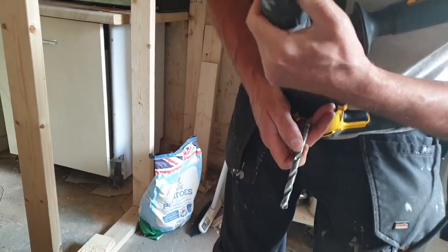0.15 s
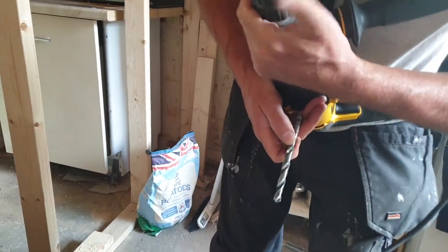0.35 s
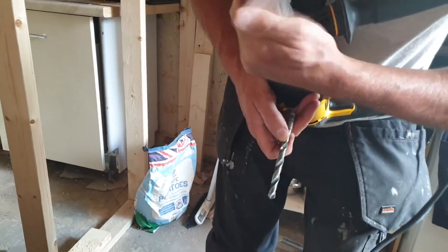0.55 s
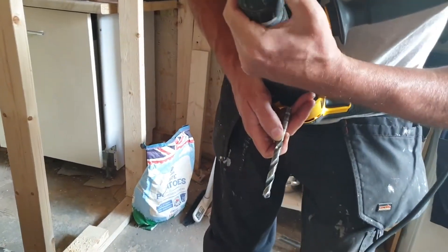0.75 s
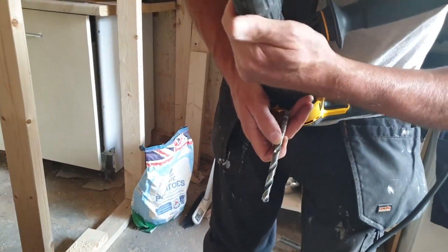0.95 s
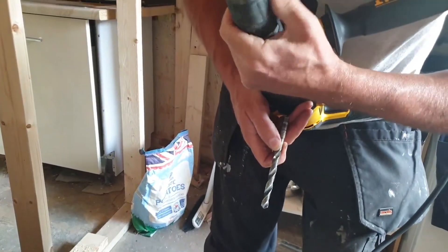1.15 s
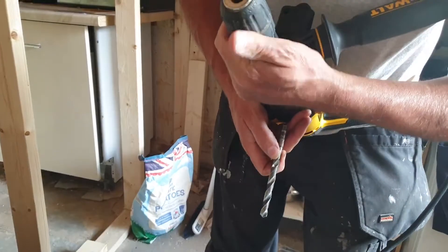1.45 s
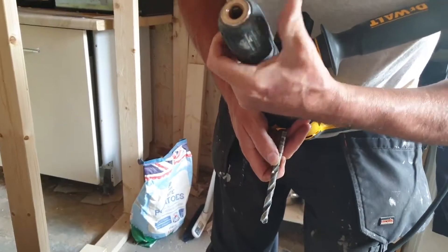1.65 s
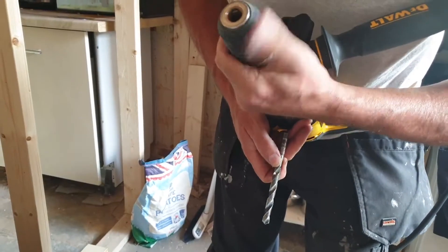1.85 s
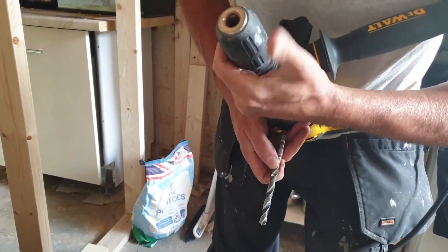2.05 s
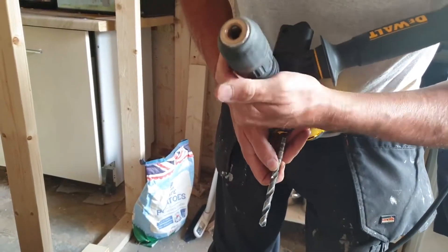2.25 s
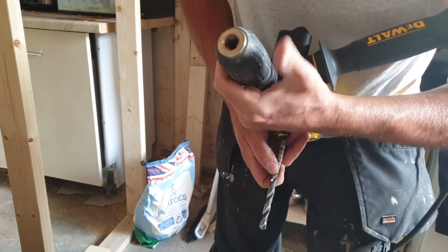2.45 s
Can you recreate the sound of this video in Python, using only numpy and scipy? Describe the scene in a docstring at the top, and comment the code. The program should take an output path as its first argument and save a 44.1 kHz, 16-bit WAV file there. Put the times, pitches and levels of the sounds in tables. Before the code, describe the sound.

A keyless drill chuck is twisted by hand, close and slightly left, with the motor off. Skin brushes the sleeve, then a clack and a sharp snap come at about 0.2 seconds. Seven short ratcheting rasps follow evenly from 0.3 to 2.3 seconds, the last two loudest, with light clacks between them. A faint thin whine comes and goes just after 1 second. Quiet air of a small room lies underneath.

```python
"""Close stereo microphone in a small timber-framed room; just to the left, a keyless drill chuck is
twisted by hand, motor off. Skin brushes the sleeve, the loose sleeve clacks as the hand grips, and
the lock snaps hard, once. Seven twists drag the pawls over the ratchet teeth, each swelling and
fading with the speed of the sleeve, with more clacks as the hand grips again. About a second in,
a faint thin whine comes and goes. Quiet room air lies under it all."""
import sys
import numpy as np
from scipy import signal
from scipy.fft import rfft, irfft
from scipy.io import wavfile

SR = 44100
rng = np.random.default_rng(int(sys.argv[2]) if len(sys.argv) > 2 else 0)


def materialize(psi):
    """Save the field psi as 16-bit PCM at rate SR to the path in sys.argv[1].

    A 1-D psi becomes a single channel; in a 2-D psi each row is a channel.
    """
    bounded = np.clip(np.atleast_2d(psi).T, -1, 1)
    quanta = np.round(bounded * 32767).astype(np.int16)
    wavfile.write(sys.argv[1], SR, quanta)


N = 114660

# Spectrum of a pawl knocking on a tooth: frequency_hz, relative_db
TOOTH_SPECTRUM = [(100, -63.5), (350, -22), (700, -19), (1000, -21.5), (1300, -4.5), (1600, 6.5),
                  (2000, -9), (2450, -5), (3200, -27), (4000, -16), (8000, -24.5), (16000, -29.5)]
IMPACT_DB, TOOTH_RATTLE_DB = -9, -5
ROOM_APART_HZ = 3100  # above this, diffuse sound is unrelated in the two channels


def twists():
    """Pawls knock from tooth to tooth and scrape in fine grains all round the sleeve."""
    # Turns of the sleeve: start_s, fastest_s, level_db, rise_s, fall_s, peak_teeth_per_s,
    # scrape_db, knock_db, lead_in_db, body_db
    turns = [(0.237, 0.303, -38.5, 0.092, 0.015, 300, 0.5, -5, -16, 2),
             (0.539, 0.642, -34, 0.021, 0.027, 245, -1, -3.5, -17, 1),
             (0.872, 0.939, -35, 0.016, 0.017, 260, -0.5, -1.5, -28, -0.5),
             (1.222, 1.314, -35, 0.02, 0.023, 256, 2, 3.5, -19.5, 3),
             (1.558, 1.652, -39, 0.016, 0.019, 250, -2, -2.5, -13, 0.5),
             (1.814, 1.967, -30.5, 0.018, 0.026, 240, -1.5, -0.5, -23.5, 2.5),
             (2.233, 2.304, -31, 0.011, .023, 265, -2, 2.5, -29, -0.5)]
    # Spectrum of the sliding pawls: frequency_hz, relative_db
    scrape_spectrum = [(100, -34.5), (450, -10.5), (950, -2.5), (1500, 1), (2500, 7), (3300, -5),
                       (3900, 2.5), (5700, -6.5), (6500, -3.5), (8000, -12), (9500, -22), (10300, -9),
                       (11000, 1.5), (12200, -22), (14000, -9.5), (15600, -8.5)]
    grains_per_s, grain_scatter_db, scrape_pulsing = 5000, 6, 0.16
    jitter_teeth, tooth_scatter_db = .07, 2.2
    crest_rounding, slide_fall_s = .8, 0.0067
    t = np.arange(N) / SR
    grains = (rng.random((2, N)) < grains_per_s / SR) * rng.choice([-1, 1], (2, N))
    grains = grains * undb(grain_scatter_db * rng.standard_normal((2, N)))
    grains = spread(grains, apart_hz=3670)
    knocks = scrapes = 0
    for start, fastest, db, rise, fall, rate, scrape_db, knock_db, lead_in_db, body_db in turns:
        from_peak = (t - fastest) / np.where(t < fastest, rise, fall)
        swell = np.exp(crest_rounding - np.hypot(from_peak, crest_rounding)) * (t > start)
        slow_slide = undb(lead_in_db) * np.exp(-np.maximum(t - fastest, 0) / slide_fall_s)
        force = np.hypot(swell, slow_slide) * (t > start)
        teeth_passed = np.cumsum(rate * force ** .13) / SR  # the rate varies far less than the force
        crossings = np.flatnonzero(np.diff(np.floor(teeth_passed)))
        lateness, scatter = rng.standard_normal((N // 100, 2))[:len(crossings)].T
        hits = np.clip(crossings + lateness * jitter_teeth * SR / rate, 0, N - 1).astype(int)
        strength = swell[crossings] * undb(db + knock_db + tooth_scatter_db * scatter)
        teeth = np.bincount(hits, strength, N) * np.sqrt(SR / rate)
        pulsing = 1 + scrape_pulsing * np.cos(2 * np.pi * teeth_passed)
        scrape = grains * force * undb(db + scrape_db) * pulsing
        grip = response([(700, body_db), (1300, 0.0037)])
        knocks = knocks + through(teeth, grip)
        scrapes = scrapes + through(scrape, grip)
    knocks = chuck(undb(-5) * colour(knocks, TOOTH_SPECTRUM), TOOTH_RATTLE_DB)
    scrapes = chuck(undb(-1) * colour(scrapes, scrape_spectrum), rattle_db=-3.5)
    return knocks + scrapes


def catches():
    """Now and then one tooth holds longer and lets go with a harder knock."""
    # Teeth letting go: time_s, level_db
    releases = [(0.6368, -2.5), (0.933, -16), (1.32, -3), (1.9266, -12), (1.9459, -5), (1.956, -3),
                (1.9641, 0), (2.2856, -6.5), (2.2936, -3)]
    push = np.zeros(N)
    for at, db in releases:
        push[int(at * SR)] = undb(db)
    return chuck(undb(IMPACT_DB) * colour(push, TOOTH_SPECTRUM), TOOTH_RATTLE_DB)


def clacks():
    """The loose sleeve takes up its slack, chatters briefly and rebounds once."""
    # Sleeve contacts: start_s, level_db, body_db, treble_db, rebound_after_s, rebound_db
    contacts = [(0.204, -1, -5.5, -11, 0.003, -5.5), (0.4145, -6, -4.5, -6.5, 0.0043, 5),
                (0.5394, -5.5, 6, 7.5, .0035, -5), (0.8677, -13.5, -11.5, -16.5, 0.0044, -7),
                (1.2203, -4.5, -6.5, -17, .0025, 1), (1.2539, -0.5, -7, -8.5, .002, -9.5),
                (1.534, -15, -7, -19.5, .009, 2), (1.585, -2.5, 5.5, -7, 0.0062, -12.5),
                (1.6363, -9.5, 5, -25, 0.002155, 3.5), (1.8146, -4.5, -1, -4, .0035, -8),
                (1.859, -13.5, 4, -5.5, 0.01, -3.5), (2.236, -27.5, 4, -40, 0.027, 5)]
    # Spectrum of the struck sleeve: frequency_hz, relative_db
    sleeve_spectrum = [(100, -42), (850, -28.5), (1100, -19.5), (1500, 1.5), (2000, -6.5), (2600, -2.5),
                       (3200, -12), (4000, -2.5), (5500, -7.5), (6500, -3.5), (8000, -9), (10000, -11.5),
                       (11100, -2), (12500, -24.5), (15500, -8.5)]
    impacts = 0
    for at, db, body_db, treble_db, rebound_s, rebound_db in contacts:
        push = np.zeros(N)
        push[int(at * SR)] = undb(db)
        push[int((at + rebound_s) * SR)] += undb(db + rebound_db)
        chatter = undb(-3) * through(push, tail(t60_s=0.003, build_s=0.00013))
        tone = response([(1700, body_db), (4000, 0.0022), (10000, treble_db)])
        impacts = impacts + through(push + chatter, tone)
    return chuck(undb(IMPACT_DB) * colour(impacts, sleeve_spectrum), rattle_db=-4.5)


def chuck(contact, rattle_db):
    """A contact sets the chuck ringing and its loose parts rattling."""
    # Resonances of the chuck: pitch_hz, relative_db, t60_s
    modes = [(1288, 3, 0.04), (1469, -4.5, 0.026), (1648, -11.5, 0.037), (2080, -19.5, 0.23),
             (2330, 1, 0.053), (2334, -5, 0.21), (2800, -7, 0.082), (2823, 6, 0.063), (3697, 8, 0.076),
             (4170, -6, 0.099), (5860, -14, 0.023), (6450, -1, 0.044), (6620, 0, 0.047), (10850, -6, .012)]
    t = np.arange(SR // 4) / SR
    ring = sum(undb(db - 47) * np.cos(2 * np.pi * hz * t) * fade(t, t60) for hz, db, t60 in modes)
    rattle = undb(rattle_db) * through(contact, tail(t60_s=0.036, build_s=0.0014))
    return contact + through(contact, ring) + rattle


def snap():
    """The lock jumps over its detent with one hard, light crack and a short, bright echo."""
    # Resonances of the lock: pitch_hz, relative_db, t60_s, left_minus_right_db
    modes = [(1836, -2, 0.016, 6.5), (4670, 11, 0.011, -9), (6630, 0.5, 0.031, -7),
             (8470, 15, 0.00072, 17.5), (13750, 12, 0.0038, 9.5)]
    # Tone of the room's answer: frequency_hz, gain_db
    echo_spectrum = [(6800, -4.5), (8500, -2), (14000, -18.5)]
    start_s, gain_db = .2404, -26.5
    t = np.maximum(np.arange(N) / SR - start_s, 0)
    sides = np.array([[.5], [-.5]])
    crack = sum(undb(db + gain_db + sides * pan_db) * np.sin(2 * np.pi * hz * t) * fade(t, t60)
                for hz, db, t60, pan_db in modes)
    crack = signal.sosfilt(signal.butter(4, 1296, "high", fs=SR, output="sos"), crack)
    echo = through(through(crack, response(echo_spectrum)), tail(t60_s=.06, build_s=0.0051))
    return crack + undb(-2.5) * echo


def brush():
    """Skin slides over the plastic sleeve; twice a fingertip skids with a thin swish."""
    # Loudness of the sliding hand: time_s, level_db
    rub_levels = [(0, -40), (.04, -51.5), (.063, -48.5), (.09, -52), (.2, -53), (.36, -54.5), (.395, -54),
                  (.45, -56.5), (.52, -68), (.8, -103.5), (1.0, -53), (1.1, -66.5), (1.5, -70),
                  (1.85, -63.5), (2.15, -72), (2.6, -76.5)]
    # Spectrum of skin on plastic: frequency_hz, relative_db
    skin_spectrum = [(100, -13), (400, 2), (900, -6), (1500, 0), (2400, -1.5), (3200, -2.5), (4200, -3),
                     (6000, -10), (7800, -7), (9500, -18.5), (11000, -7.5), (12500, -13.5), (15000, -2.5)]
    # Fingertip skids: centre_s, level_db, half_length_s
    skids = [(0.074, -46, 0.017), (0.402, -54, 0.015)]
    # Spectrum of a skid: frequency_hz, relative_db
    skid_spectrum = [(1000, -35), (6000, -20), (7900, -2), (9500, -20), (12500, -9), (14500, 6),
                     (16000, -1)]
    t = np.arange(N) / SR
    skid_swells = sum(undb(db) * np.exp(-((t - at) / half) ** 2) for at, db, half in skids)
    rub = colour(stereo_noise(N, ROOM_APART_HZ), skin_spectrum) * curve(rub_levels)
    swish = colour(stereo_noise(N, ROOM_APART_HZ), skid_spectrum) * skid_swells
    return rub + swish


def whine():
    """Two rough tones an octave apart rise briefly out of a faint narrow hiss."""
    # Swell of the two tones: time_s, upper_db, lower_db
    tone_levels = [(.9, -85, -106.5), (.99, -74, -80), (1.08, -59.5, -72), (1.14, -57, -64),
                   (1.21, -57, -63.5), (1.3, -90, -110)]
    # Loudness of the hiss: time_s, level_db
    hiss_levels = [(0, -67.5), (.3, -58.5), (.8, -93), (1.0, -59.5), (1.45, -69.5), (2.2, -69.5),
                   (2.6, -98)]
    pitch_hz, width_hz = 2123, 115
    upper = noise_band(2 * pitch_hz, 1.2 * width_hz) * curve(tone_levels, column=1)
    lower = noise_band(pitch_hz, width_hz) * curve(tone_levels, column=2)
    hiss = noise_band(centre_hz=4025, width_hz=640) * curve(hiss_levels)
    return upper + lower + hiss


def room_air():
    """Quiet, low, steady room tone."""
    # Spectrum of the still room: frequency_hz, relative_db
    air_spectrum = [(20, -23.5), (60, 1.5), (110, -4), (210, -0.5), (300, -10), (420, -2), (600, -12),
                    (1500, -23.5), (4000, -26), (8000, -37), (16000, -29)]
    return undb(-69) * colour(stereo_noise(N, apart_hz=1410), air_spectrum, size=8192)


def microphone(sound):
    """Sound from the left reaches the right channel slightly later and, in most bands, weaker."""
    # Balance at the microphone: frequency_hz, left_minus_right_db
    balance = [(300, 2), (1500, 3.5), (2400, 1), (4000, 1.5), (5200, 8.5), (6600, 7), (8800, 7.5),
               (11000, 2), (12500, -2.5), (15500, 11)]
    lag_s = .00003
    left = through(sound[0], response([(hz, db / 2) for hz, db in balance]))[0]
    right = through(sound[1], response([(hz, -db / 2) for hz, db in balance]))[0]
    delay = np.exp(-2j * np.pi * np.arange(N // 2 + 1) * SR / N * lag_s)
    return np.array([left, irfft(rfft(right) * delay, N)])


def undb(db):
    """Decibels to gain."""
    return 10 ** (np.asarray(db) / 20)


def unit(x):
    """Scale to rms 1."""
    return x / np.sqrt(np.mean(x ** 2))


def fade(t, t60_s):
    """Exponential decay, 60 dB down at t60_s."""
    return np.exp(-np.log(1000) * t / t60_s)


def curve(table, column=1):
    """Gain along a table of time_s, level_db points."""
    rows = np.array(table)
    return undb(np.interp(np.arange(N) / SR, rows[:, 0], rows[:, column]))


def response(points, size=1024):
    """Short minimum-phase response from frequency_hz, gain_db points."""
    hz, db = np.array(points, float).T
    bins_hz = np.maximum(np.arange(size // 2 + 1) * SR / size, 1)
    cepstrum = irfft(np.log(undb(np.interp(np.log(bins_hz), np.log(hz), db))))
    cepstrum[1:size // 2] *= 2
    cepstrum[size // 2 + 1:] = 0
    return irfft(np.exp(rfft(cepstrum)))


def through(x, impulse):
    """Pass a sound through an impulse response."""
    return signal.fftconvolve(np.atleast_2d(x), np.atleast_2d(impulse), axes=-1)[:, :N]


def colour(x, points, size=1024):
    """Shape the spectrum with a response of unit energy."""
    impulse = response(points, size)
    return through(x, impulse / np.linalg.norm(impulse))


def spread(x, apart_hz):
    """Two unrelated sounds become a pair that is alike in the bass and unrelated in the treble."""
    size = x.shape[1]
    mid, side = rfft(x)
    side = side * np.clip(np.arange(len(side)) * SR / size / apart_hz, .35, 1)
    return unit(irfft(np.array([mid + side, mid - side]), size))


def stereo_noise(size, apart_hz):
    """Noise whose two channels are unrelated above apart_hz."""
    return spread(rng.standard_normal((2, size)), apart_hz)


def noise_band(centre_hz, width_hz):
    """Noise in one steep resonance."""
    detuning = (np.arange(N // 2 + 1) * SR / N - centre_hz) / width_hz
    return unit(irfft(rfft(stereo_noise(N, apart_hz=6000)) / (1 + detuning ** 2) ** 2, N))


def tail(t60_s, build_s):
    """Diffuse stereo decay of unit energy a channel, with a short build-up."""
    t = np.arange(SR // 2) / SR
    decay = stereo_noise(len(t), ROOM_APART_HZ) * fade(t, t60_s) * np.minimum(t / build_s, 1)
    return decay / np.sqrt(np.sum(decay ** 2) / 2)


def scene():
    """The chuck is close to the microphone and a little to the left; the room answers briefly."""
    ratchet = twists() + clacks() + catches()
    room = undb(-12.5) * through(ratchet.mean(axis=0), tail(t60_s=0.17, build_s=0.015))
    return microphone(ratchet + room + snap() + brush() + whine()) + room_air()


def record(dry):
    """The recorder cuts the top steeply above 15850 Hz."""
    return signal.sosfilt(signal.ellip(10, .2, 70, 15850, fs=SR, output="sos"), dry)


dry = scene()
out = record(dry)
materialize(out)
```